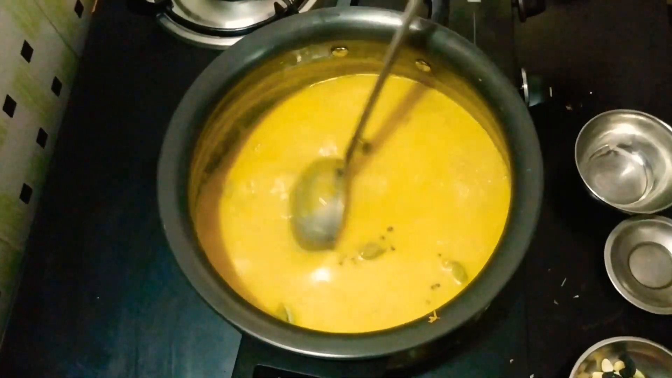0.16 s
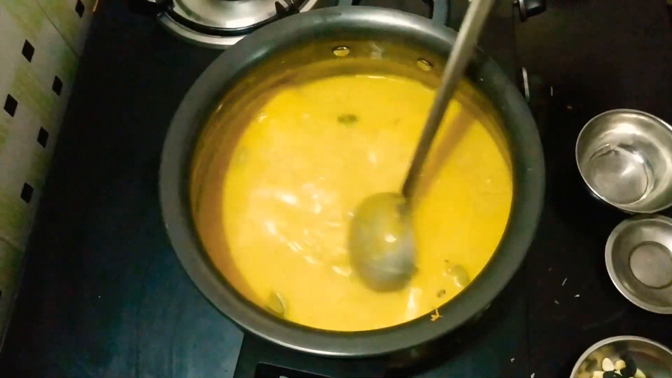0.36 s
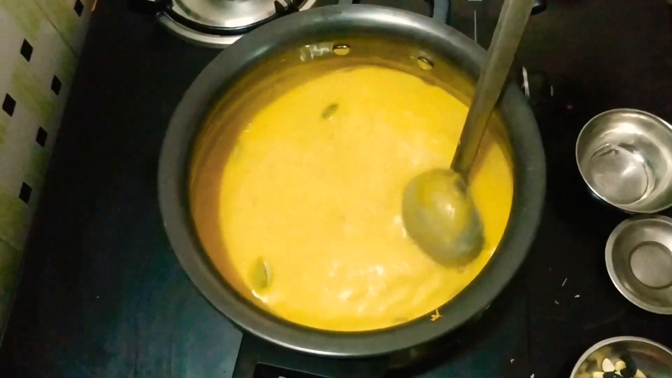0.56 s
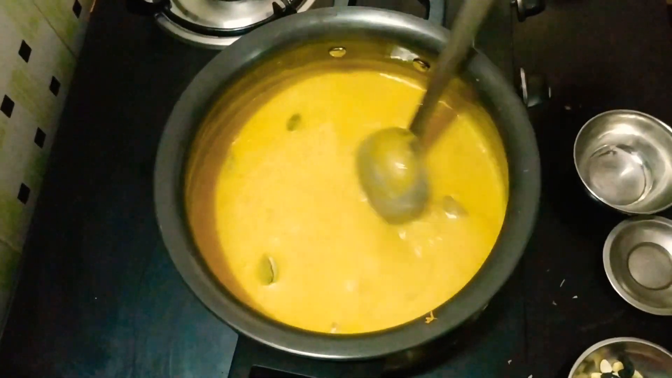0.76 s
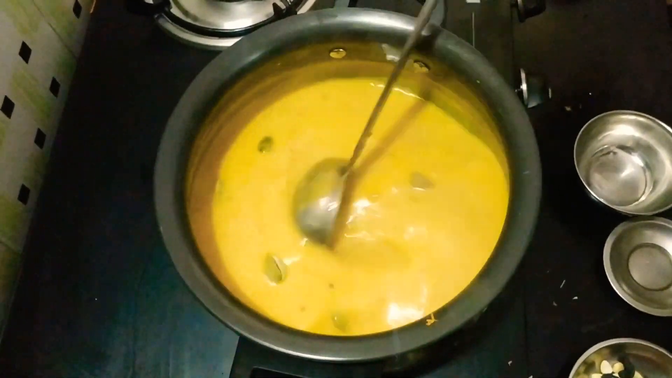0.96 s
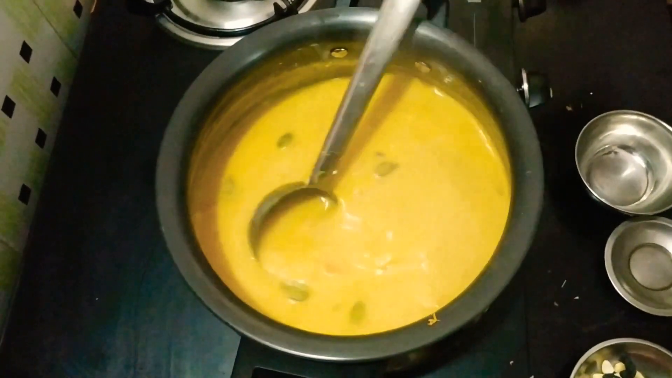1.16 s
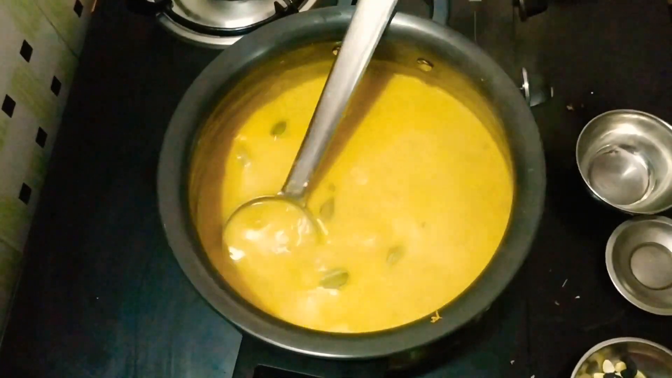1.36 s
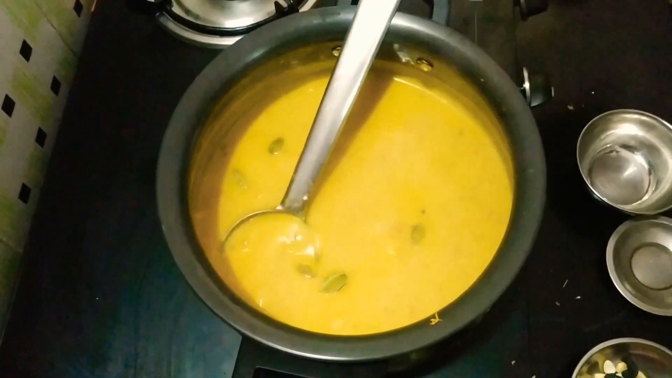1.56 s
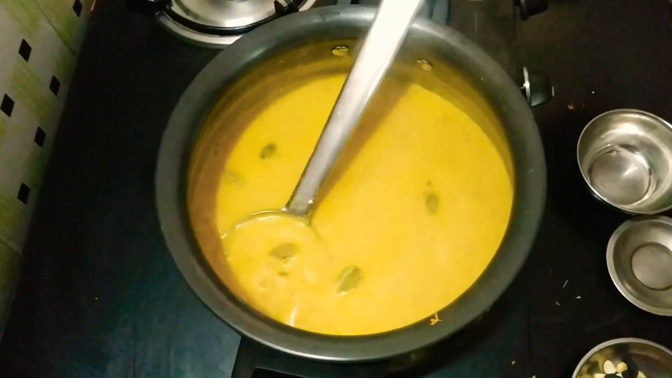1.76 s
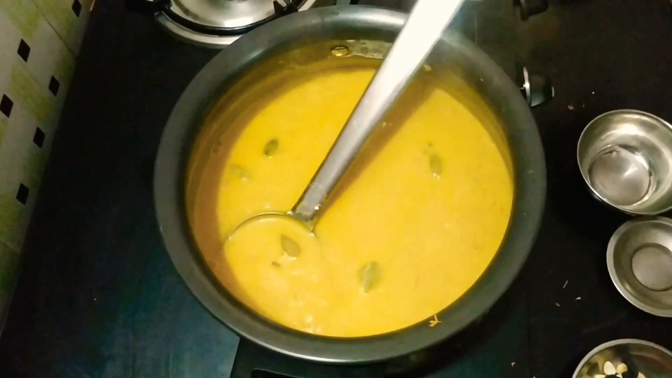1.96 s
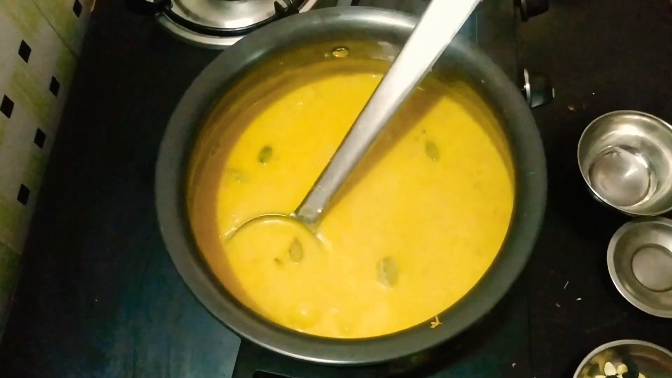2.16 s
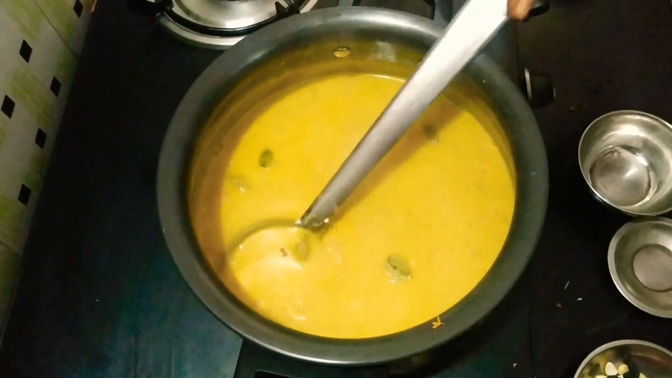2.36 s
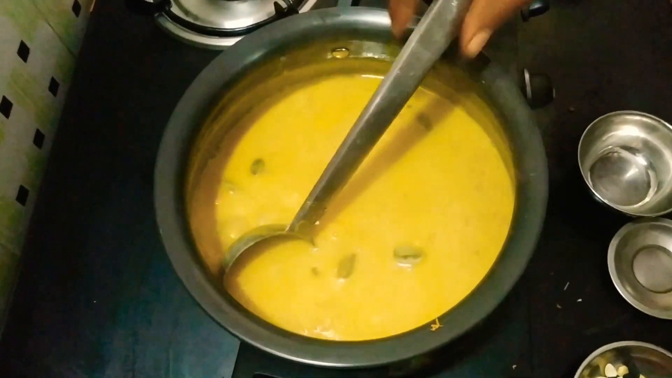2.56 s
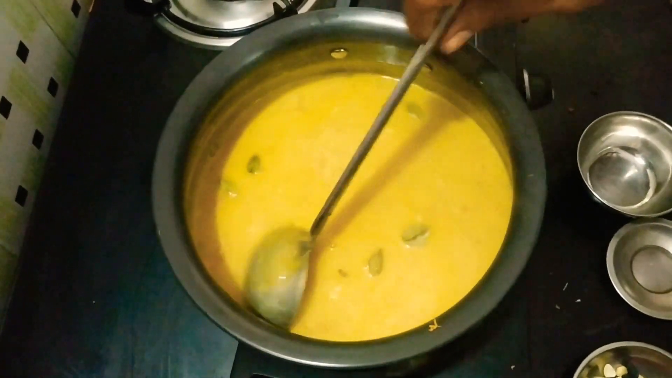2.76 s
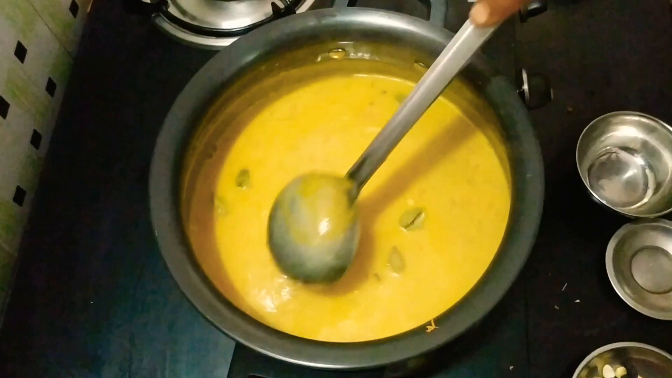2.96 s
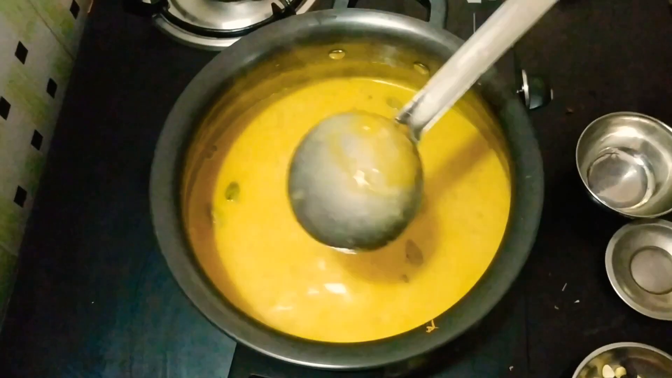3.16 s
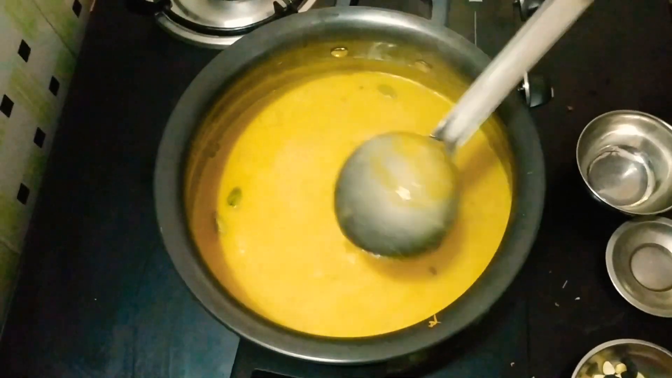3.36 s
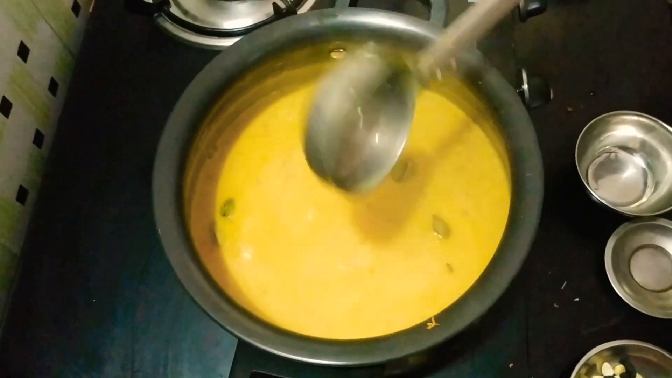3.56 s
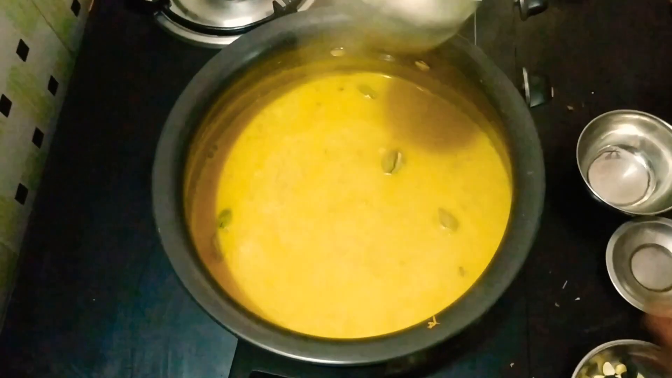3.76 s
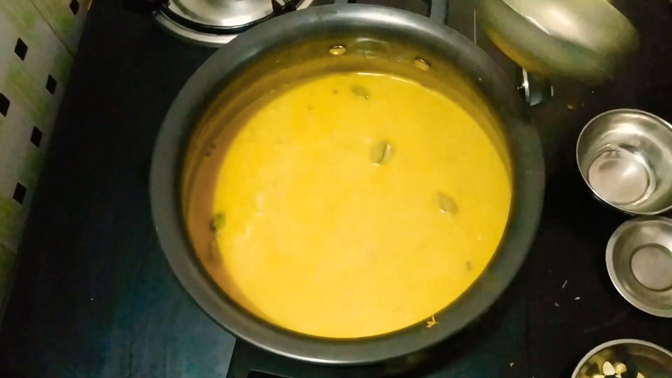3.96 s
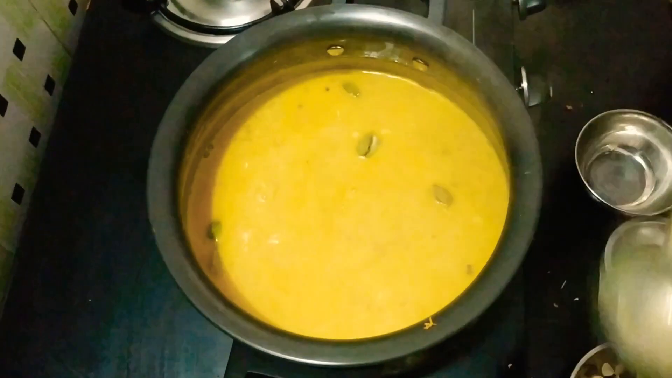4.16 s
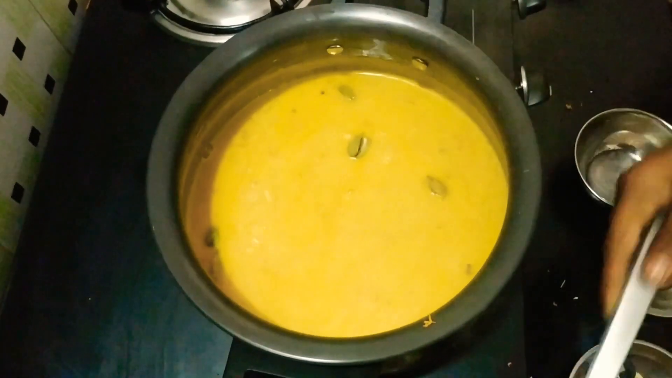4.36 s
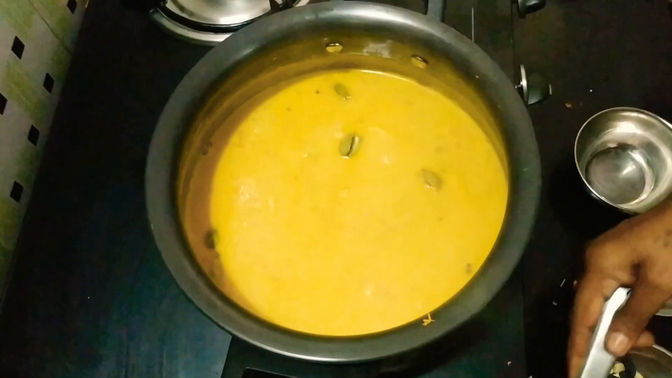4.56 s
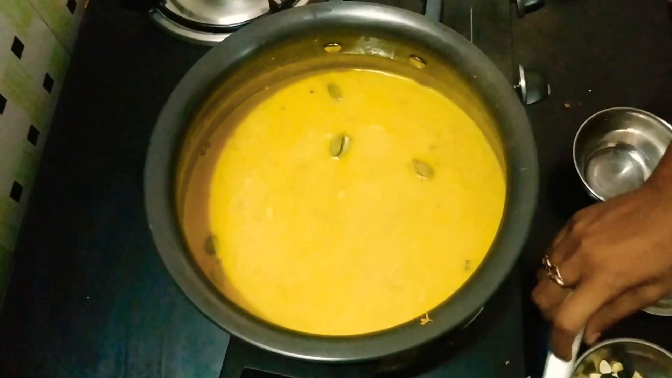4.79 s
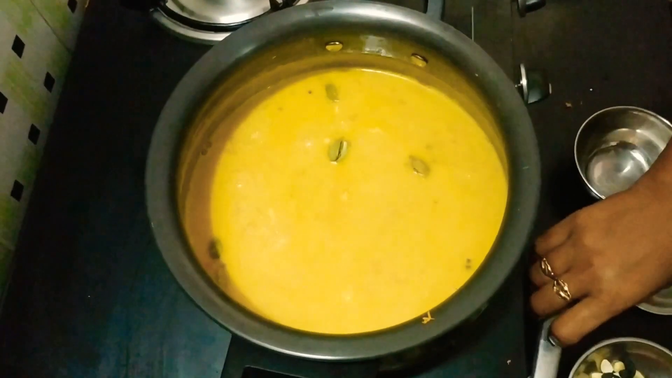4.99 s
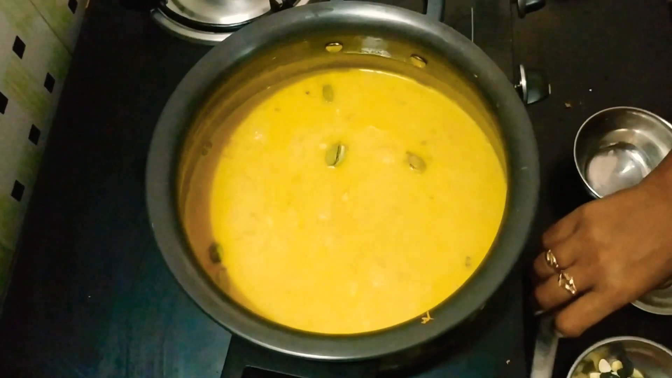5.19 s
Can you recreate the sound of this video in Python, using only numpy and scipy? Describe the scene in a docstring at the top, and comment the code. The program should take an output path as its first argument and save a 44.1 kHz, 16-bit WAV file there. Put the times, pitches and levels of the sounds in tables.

```python
"""A small, hard kitchen, a stereo pair of microphones close to a metal pot on the stove.
A steel ladle swishes through thick curry, knocks the full pot into a damped boom, and clinks and
scrapes along the ringing wall. It is lifted out, set down on the counter, and at last clatters
against a thin steel bowl. The tiles give a short tail; the room hums faintly behind it all."""
import sys
import numpy as np
from scipy import signal
from scipy.fft import rfft, irfft
from scipy.io import wavfile
from scipy.ndimage import uniform_filter1d, map_coordinates

SR = 44100
rng = np.random.default_rng(int(sys.argv[2]) if len(sys.argv) > 2 else 0)


def waveform_to_disk(signal):
    """Save audio, clipped to [-1, 1], as 16-bit WAV at the path in sys.argv[1]."""
    frames = np.transpose(np.atleast_2d(signal))
    scaled = np.clip(frames, -1, 1) * 32767
    samples = np.round(scaled).astype(np.int16)
    wavfile.write(sys.argv[1], SR, samples)


N = 230476
TIME = np.arange(N) / SR
RING_TIME = TIME[:SR]  # every strike gets one second to ring

# Spectrum of the ladle's clack on pot or counter. Each row: frequency in Hz, relative level in dB.
CLACK_SPECTRUM = [(150, 4), (350, 5), (700, -1), (1000, -2), (1400, 3.5), (1900, -7.5), (2700, 2),
                  (4000, -9), (8000, -11.5), (16000, -25)]


def amp(db):
    """Decibels to gain."""
    return 10 ** (np.asarray(db) / 20)


def unit(x):
    """Scales to rms 1."""
    return x / np.sqrt(np.mean(x ** 2) + 1e-20)


def read(points, hz):
    """Reads a table on a log-frequency axis."""
    f, value = np.transpose(points)
    return np.interp(np.log(hz + 1), np.log(f + 1), value)


def add(mix, start, sound):
    """Adds a stereo sound at start, in seconds."""
    part = mix[:, round(start * SR):][:, :sound.shape[1]]
    part += sound[:, :part.shape[1]]


def wander(per_s):
    """A random curve that takes per_s new turns a second."""
    knots = np.arange(0, N / SR + 1, 1 / per_s)
    return np.interp(TIME, knots, rng.standard_normal(len(knots)))


def lumps(per_s, depth_db):
    """A gain that wanders at random."""
    return amp(depth_db * wander(per_s))


def wavering(x, per_s, share):
    """Lets every pitch in x wander by a small share."""
    position = np.arange(N) + share * SR / per_s * wander(per_s)
    return np.array([map_coordinates(side, [position], order=3) for side in x])


def patchy(x, depth_db):
    """Brief patches, each at its own pitch, flare up and drop out."""
    spectra = signal.stft(x, nperseg=256)[2]
    field = rng.standard_normal(spectra.shape[:0:-1])  # time by frequency
    field = uniform_filter1d(uniform_filter1d(field, size=11, axis=0), size=3, axis=1)
    return signal.istft(spectra * amp(depth_db * unit(field).T), nperseg=256)[1][:, :N]


def stroke(peak, attack, hold, release, depth_db=21.5):
    """Gain of one hand movement: rises depth_db per attack time, holds, falls as much per release."""
    under = np.maximum(peak - TIME, 0) / attack + np.maximum(TIME - peak - hold, 0) / release
    return amp(-depth_db * np.minimum(under, 10))


def grains(per_s, spread_db):
    """Random clicks of uneven size."""
    size = amp(spread_db * np.minimum(rng.exponential(1, N), 4))
    return unit(size * rng.choice([-1, 1], N) * (rng.random(N) < per_s / SR))


def coloured(x, gain):
    """Filters two unrelated channels by gain(Hz); the bass reaches both microphones nearly alike."""
    # Likeness across the pair. Each row: frequency in Hz, left-right correlation.
    likeness = [(30, 0.98), (100, 0.96), (350, 0.87), (650, 0.72), (1200, 0.12), (2500, 0), (16000, 0)]
    hz = np.fft.rfftfreq(x.shape[1], 1 / SR)
    a, b = rfft(x)
    same = read(likeness, hz)
    mid, side = a * np.sqrt(1 + same), b * np.sqrt(1 - same)
    return unit(irfft(np.array([mid + side, mid - side]) * gain(hz), x.shape[1]))


def resonate(x, hz, width):
    """A steep resonance that can follow a moving frequency."""
    carrier = np.exp(2j * np.pi * np.cumsum(hz * np.ones(N)) / SR)
    pole = np.exp(-np.pi * width / SR)
    return unit((carrier * signal.lfilter([1], np.poly([pole, pole]), x / carrier)).real)


def crash(gain, t60):
    """A crowd of overlapping modes: coloured noise that dies away."""
    return coloured(rng.standard_normal((2, SR)), gain) * amp(-60 * RING_TIME / t60)


def ring(modes, length=1):
    """Decaying modes, some leaning to one side; short waves reach the pair in unrelated phase."""
    out = np.zeros((2, SR))
    for hz, db, t60, *lean in modes:
        phase = rng.uniform(-np.pi, np.pi, (2, 1)) * min((hz / 1500) ** 2, 1)
        sides = unit(amp(sum(lean) / 2 * np.array([[1], [-1]])))
        decay = amp(db - 60 * RING_TIME / (t60 * length))
        out += sides * decay * np.sin(2 * np.pi * hz * RING_TIME + phase)
    return out / np.linalg.norm(amp([mode[1] for mode in modes]))


def room_tone(air_db=-54.5):
    """The kitchen behind the pot: steady rumble and hiss with a few wavering low tones."""
    # Rumble and hiss. Each row: frequency in Hz, relative level in dB.
    air_spectrum = [(12, -4), (19, 2.5), (55, -11), (85, -5.5), (153, -11.5), (181, -24.5), (221, -16.5),
                    (284, -16), (419, -19), (693, -26), (775, -29.5), (2240, -32.5), (6120, -36.5),
                    (13400, -38), (15800, -36)]
    # The low drone. Each row: frequency in Hz, width in Hz, level in dB.
    hum_tones = [(82.7, 9.4, -62), (183.9, 8.7, -69.5), (291, 20, -69.5), (371.3, 14, -74.5)]
    air = coloured(rng.standard_normal((2, N)), lambda hz: amp(read(air_spectrum, hz)))
    hum = sum(amp(db) * resonate(rng.standard_normal(N), hz, width) for hz, width, db in hum_tones)
    return amp(air_db) * air + hum


def swishes(swish_db=-1, fizz_db=-2):
    """Each move swells as a grainy swish and fizz, like thick liquid folding and tiny bubbles bursting."""
    # The ladle moves in the curry, then in the hand on its way to the counter.
    # Each row: peak time, attack and release in seconds, relative swish and fizz levels in dB.
    moves = [(.02, 0.13, 0.24, -76, -55.5), (0.099, 0.12, 0.66, -50, -56.5), (.31, 0.1, 0.077, -56, -57.5),
             (0.539, 0.23, 0.09, -48.5, -53), (.785, 0.26, 0.38, -46, -50.5),
             (1.045, 0.023, 0.086, -58, -52.5), (1.105, 0.035, 0.13, -50.5, -56),
             (1.258, 0.04, 0.066, -53, -74), (1.411, 0.16, 0.21, -57.5, -61),
             (2.43, 0.66, 0.52, -60, -57.5), (2.706, 0.039, 0.086, -50.5, -58),
             (3.44, 0.11, 0.58, -79, -61), (3.74, 0.08, 0.099, -80, -60.5), (4.32, 1, 0.52, -64, -86),
             (4.72, 0.4, 0.72, -66, -60)]
    # Spectra of the swish and of the fizz on top. Each row: frequency in Hz, relative level in dB.
    swish_spectrum = [(300, -18), (700, 0.5), (1300, 2.5), (1700, -1.5), (2550, 4.5), (3400, -6.5),
                      (5000, -7), (8000, -17)]
    fizz_spectrum = [(2500, -8.5), (5000, -6.5), (8000, -3), (10000, -5.5), (12500, -9.5), (16000, -18)]
    swells = np.array([stroke(peak, attack, 0, release) for peak, attack, release, _, _ in moves])
    swish, fizz = np.transpose(moves)[-2:]
    out = np.zeros((2, N))
    for spectrum, db in ((swish_spectrum, swish + swish_db), (fizz_spectrum, fizz + fizz_db)):
        pops = np.array([grains(per_s=1500, spread_db=0.5) for _ in range(2)])
        wash = coloured(pops + rng.standard_normal((2, N)), lambda hz: amp(read(spectrum, hz)))
        texture = patchy(wash, depth_db=3.3) * lumps(per_s=90, depth_db=2.16)
        out += unit(texture) * np.sqrt(amp(db) ** 2 @ swells ** 2)  # moves add in power
    return out


def rubbing(strokes, mode_sets, rub_db=-4):
    """Fine slips keep a few resonances sounding for the length of each stroke."""
    out = np.zeros((2, N))
    for (peak, attack, hold, release, push_db), modes in zip(strokes, mode_sets):
        clicks = np.array([grains(per_s=2400, spread_db=5.0) for _ in range(2)])
        slips = coloured(clicks, np.ones_like)
        body = sum(amp(db) * resonate(np.roll(slips, rng.integers(N), axis=1), hz, width)
                   for hz, width, db in modes)
        out += amp(push_db + rub_db) * stroke(peak, attack, hold, release) * body
    return out


def floor_rubs():
    """The sunken ladle rubs across the pot floor, muffled by the curry."""
    # Each row: time of full pressure, attack, hold and release in seconds, relative level in dB.
    strokes = [(0.207, 0.28, 0.11, 0.22, -55.5), (2.877, 0.05, 0.025, 0.32, -48)]
    # The pot floor's ring, one list a stroke. Each row: frequency and width in Hz, relative level in dB.
    floor_modes = [
        [(828, 91, 0.5), (1026, 240, 3.5), (1227, 19, 0)],
        [(510, 110, -12), (896, 200, -6.5), (1000, 99, -5.5), (1240, 380, -3), (1420, 56, -2.5)],
    ]
    return rubbing(strokes, floor_modes)


def clack(cutoff_hz, t60):
    """The short noise of a hard contact, rolled off above the cut-off."""
    return crash(lambda hz: amp(read(CLACK_SPECTRUM, hz)) / np.sqrt(1 + (hz / cutoff_hz) ** 4), t60)


def thud(t60):
    """The dull shudder of the worktop."""
    onset = 1 - np.exp(-RING_TIME / 0.0069)
    return crash(lambda hz: 1 / (1 + ((hz - 300) / 160) ** 4), t60) * onset


def pot_knocks(thud_db=-9):
    """Each knock of the ladle booms the pot; harder contacts add a brighter clack."""
    # Each row: start in seconds, boom level in dB, boom rise in seconds, ring length factor,
    # clack level in dB, clack cut-off in Hz, clack t60 in seconds.
    knocks = [(0.453, -32.5, 0.0038, 0.83, -39.5, 590, 0.12), (0.471, -59, 0.0033, 0.77, -53, 2780, 0.15),
              (0.795, -30, 0.0013, 1.03, -30.5, 4100, 0.064), (0.815, -41, 0.0035, 0.6, -39, 2160, 0.33),
              (0.909, -34, 0.0024, 0.61, -33.5, 1970, 0.082), (1.084, -46, 0.003, 0.6, -47, 1560, 0.06),
              (1.174, -53.5, 0.0033, 2.2, -49.5, 3970, 0.14),
              (1.366, -31.5, 0.0015, 0.55, -48, 1000, 0.056), (1.382, -42.5, 0.0043, 3.2, -55, 2050, 0.41),
              (1.503, -30.5, 0.0018, 1.25, -33, 4040, 0.12), (1.524, -36, 0.0036, 0.71, -36, 2420, 0.098),
              (1.549, -33, 0.0018, 1.2, -42.5, 2020, 0.39),
              (2.725, -40.5, 0.0043, 1.65, -32.5, 4170, 0.036)]
    # The full pot, damped by curry. Each row: frequency in Hz, relative level in dB, base t60 in seconds.
    pot_modes = [(78.8, -3.5, 0.34), (183.4, 10, 0.17), (244.5, 4.5, 0.53), (291, 2.5, 0.32),
                 (370.6, -3.5, 0.19), (406, -14, 0.14), (446, -0.5, 0.16), (611, -7, 0.15),
                 (667, -6.5, 0.088)]
    out = np.zeros((2, N))
    for start, boom_db, rise, length, clack_db, cutoff_hz, t60 in knocks:
        contact = amp(clack_db) * clack(cutoff_hz, t60)
        boom = ring(pot_modes, length) + amp(thud_db) * thud(t60=0.25)
        onset = 1 - np.exp(-RING_TIME / rise)
        add(out, start, amp(boom_db) * boom * onset + contact)
    return out


def steel_ring(part, length, ring_db=-3, crowd_t60=0.11, valley_db=-27):
    """One touch on the pot wall; the part of the ladle that touches decides which modes speak."""
    # Tight clusters of modes in ladle and wall. Each row: frequency and width in Hz, left minus right
    # in dB, then relative level in dB when touched by the ladle's rim, back and heel.
    clusters = [(2110, 320, 0, -6.5, -16, -16), (2780, 360, -3.5, -12.5, -6.5, -7),
                (3830, 71, -1, -17, -17, -21), (4360, 170, 1, -8, -11, -9.5),
                (4920, 72, -8, -5, -10.5, -16), (5494, 170, -1, -6.5, -10.5, -20),
                (5960, 180, 9, -12, -17, -11), (6300, 170, 1, -5, -3, -15), (6440, 68, -9, -4, -10, -11),
                (6690, 64, -8, -12, -7, -2), (7300, 180, 2, -6, -7, -6), (7380, 120, 4, -6, -4.5, -12),
                (7760, 150, 2, -6, -14, -11), (7840, 210, -2, 4, -3, -9), (8290, 120, 7, 0.5, -3, -4),
                (8670, 160, -4, -7, -7, -7), (8980, 140, 8, -2.5, -11, -19), (9320, 88, 7, -5, -10, -5),
                (9820, 110, -6, -3, -4.5, -9.5), (10020, 94, -7, 1.5, -6.5, -5),
                (10880, 290, 2, -3, -10.5, -14), (11870, 180, -1, -6, -8, -14),
                (12180, 140, 3, -14, -16, -6), (13100, 300, 0, -11, -18, -12),
                (14170, 320, -1, -12, -12, -12), (15620, 200, 11, -18, -19, -27)]
    column = ("rim", "back", "heel").index(part)
    touched = [(hz, width, lean, levels[column]) for hz, width, lean, *levels in clusters]

    def gain(f):
        """Clusters with deep valleys between them."""
        peaks = sum(amp(2 * db + lean * np.array([[1], [-1]]))
                    / (1 + ((f - hz) / (width * 0.55)) ** 2) ** 2 for hz, width, lean, db in touched)
        valleys = amp(valley_db) ** 2 * f ** 2 / (f ** 2 + 900 ** 2)
        return np.sqrt(peaks + valleys)

    # The tighter a cluster, the longer its main mode rings.
    main_modes = [(hz, db, 14.2 / width, lean) for hz, width, lean, db in touched]
    return crash(gain, crowd_t60 * length) + amp(ring_db) * ring(main_modes, length)


def clinks(steel_db=-2, crack_db=-8, crack_t60=0.05):
    """Glancing touches of steel: a bright crack, and a ring that builds up while the edge skids."""
    # Each row: start in seconds, relative level in dB, contact time in seconds, ring length factor,
    # part of the ladle.
    touches = [(0.536, -38, 0.0028, 0.3, "rim"), (1.546, -25, 0.0019, 0.79, "rim"),
               (1.549, -24, 0.0025, 0.65, "rim"), (1.593, -26, .004, 0.48, "rim"),
               (1.598, -18.5, 0.0025, 0.66, "rim"), (1.606, -25, 0.0034, 0.64, "rim"),
               (2.252, -32, 0.0028, 0.63, "heel"), (2.275, -29, 0.0043, 0.93, "heel"),
               (2.289, -41, 0.002, 1.5, "heel"), (2.727, -32, 0.00076, 0.16, "rim"),
               (2.979, -52, 0.0017, 0.6, "heel"), (3.390, -48, 0.00088, 0.13, "heel"),
               (4.606, -39, 0.00047, 0.22, "heel")]
    out = np.zeros((2, N))
    for start, db, contact, length, part in touches:
        crack = crash(lambda hz: hz ** 2 / (hz ** 2 + 4500 ** 2), crack_t60 * length)
        clink = amp(steel_db) * steel_ring(part, length) + amp(crack_db) * crack
        onset = 1 - np.exp(-2 * RING_TIME / contact)
        add(out, start, amp(db) * clink * onset)
    return out


def low_wobbles():
    """After a hard knock the pot wobbles low; a faint 80 Hz swell lies under the final clatter."""
    # Each row: start in seconds, peak level in dB, frequency in Hz, swell time in seconds.
    wobbles = [(0.802, -45, 87, 0.026), (0.886, -42, 97.5, 0.065), (1.371, -46.5, 87.7, 0.028),
               (1.538, -52, 82.45, 0.095), (5.171, -64, 80, 0.017)]
    out = np.zeros((2, N))
    for start, db, hz, swell in wobbles:
        age = RING_TIME[None] / swell
        add(out, start, amp(db) * age * np.exp(1 - age) * np.sin(2 * np.pi * hz * RING_TIME))
    return out


def wall_scrape(chatter_db=1.5, friction_db=-1.5):
    """Tiny slips ring the steel; the chatter wavers and sinks in pitch as the contact point moves."""
    # Pushes along the wall. Each row: time of full pressure, hold and release in seconds, relative
    # friction and chatter levels in dB, ring length factor, part of the ladle.
    pushes = [(1.673, 0.035, 0.1, -48, -50, 0.98, "back"),
              (1.733, 0.0077, 0.065, -37.5, -43.5, 0.99, "back"),
              (1.799, 0.015, 0.19, -33, -42, 0.74, "back"), (1.876, 0.013, 0.1, -33.5, -62, 0.46, "back"),
              (1.93, 0.0065, 0.089, -37.5, -49.5, 0.58, "back"),
              (1.987, 0.027, 0.089, -43.5, -50.5, 0.91, "back"),
              (2.254, 0.0087, 0.046, -38.5, -69, 0.6, "heel"),
              (2.278, 0.016, 0.062, -36, -60, 0.62, "heel")]
    # The dragged edge. Each row: base frequency and width in Hz, relative level in dB, share of the glide.
    chatter_modes = [(912, 70, -3, 0.88), (2120, 72, 11, 1), (2680, 80, 4, 0.3), (2811, 51, 6.5, 0.22),
                     (3805, 23, -1.5, 0.88), (6240, 41, 6, 0.5)]
    # The glide of the strongest resonance. Each row: time in seconds, frequency in Hz.
    chatter_pitch = [(1.66, 2172), (1.75, 2129), (1.83, 2108), (1.9, 2081), (2.05, 2027)]
    bite_s, build_s = 0.027, 0.048  # the edge bites at once; the chatter needs time to build up
    friction, pressure = np.zeros((2, N)), np.zeros(N)
    for peak, hold, release, slip_db, shake_db, length, part in pushes:
        slips = grains(per_s=800, spread_db=2) * lumps(per_s=110, depth_db=2.5)
        slips *= stroke(peak, bite_s, hold, release)
        body = steel_ring(part, length)
        body /= np.sqrt(np.sum(body ** 2) / 2)
        friction += amp(slip_db) * signal.oaconvolve(slips[None], body, axes=1)[:, :N]
        pressure += amp(shake_db) * stroke(peak, build_s, hold, release)
    glide = np.interp(TIME, *np.transpose(chatter_pitch)) / chatter_modes[1][0]
    glide *= 1 + 0.006 * wander(per_s=45)
    chatter = sum(amp(db) * resonate(rng.standard_normal((2, N)), hz * glide ** share, width)
                  for hz, width, db, share in chatter_modes)
    friction = wavering(friction, per_s=30, share=0.0013)
    return amp(friction_db) * friction + amp(chatter_db) * unit(chatter) * pressure


def ladle_brushes():
    """The lifted ladle is brushed lightly and, hanging free, shimmers."""
    # Each row: time of full pressure, attack, hold and release in seconds, relative level in dB.
    strokes = [(2.99, 0.026, 0.013, 0.089, -57.5), (3.74, 0.058, 0.05, 0.27, -60.5)]
    # The shimmer, one list a stroke. Each row: frequency and width in Hz, relative level in dB.
    ladle_modes = [
        [(7850, 210, -0.5), (13050, 200, -1)],
        [(3850, 300, -7.5), (6770, 220, -8), (7400, 110, -4), (11400, 340, -3), (13400, 220, -2)],
    ]
    return rubbing(strokes, ladle_modes)


def set_down(clack_db=-7):
    """The held ladle lands on the counter with a short, dull ring."""
    # Each row: start in seconds, level of the ring with its clack in dB, thud level in dB.
    landings = [(4.602, -41.5, -44), (4.607, -39, -48), (4.6104, -33.5, -46)]
    # Ladle on counter. Each row: frequency in Hz, relative level in dB, t60 in seconds.
    counter_modes = [(217, 10, 0.17), (376, 12, 0.14), (2310, -5, 0.07), (2510, 7.5, 0.13), (3480, 3, 0.03),
                     (3650, 7, 0.028), (3620, -13, 0.3)]
    out = np.zeros((2, N))
    for start, db, thud_db in landings:
        contact = amp(clack_db) * clack(cutoff_hz=4500, t60=0.13) + ring(counter_modes)
        add(out, start, amp(db) * contact + amp(thud_db) * thud(t60=0.084))
    return out


def bowl_clatter(crash_db=-7.5, favour_db=17.5, favour_octaves=0.074, rise_s=0.00063):
    """The ladle bounces on a thin steel bowl, jolting the worktop; each spot struck favours one pitch."""
    # Each row: start in seconds, level in dB, treble tilt in dB per octave, crash t60 in seconds,
    # favoured frequency in Hz, worktop knock in dB.
    strikes = [(5.17, -36, 1, 0.051, 8830, -64), (5.174, -20, 0.5, 0.091, 4720, -40.5),
               (5.191, -8.5, 10, 0.067, 7250, -53), (5.1923, -14, 1, .05, 2780, -39.5),
               (5.1947, -12.5, 0.5, 0.13, 4468, -60), (5.197, -18.5, 8, 0.16, 9780, -60),
               (5.209, -14.5, 2, 0.015, 1880, -51), (5.2116, -10.5, -1.5, 0.03, 3260, -30.5),
               (5.222, -19, 0.5, .1, 4720, -53)]
    # The bowl's ring. Each row: frequency in Hz, relative level in dB, t60 in seconds,
    # left minus right in dB.
    bowl_modes = [(1894, -1, 0.018, 2), (2780, 0, 0.085, 4), (3260, 4, 0.035, -1), (4468, -7, 0.05, 7),
                  (4720, -9, 0.04, 2), (6984, -2, 0.067, 6), (7146, -3, 0.04, 4), (7358, -2, 0.04, 6),
                  (8400, -2, .07, -11), (8850, 0, 0.08, 5), (9774, 1, 0.09, -5), (10011, -1, 0.08, -3),
                  (11885, 6, 0.03, -1), (14700, -10, .05, 2), (15665, -14, .08, 2)]
    # The bowl's crash. Each row: frequency in Hz, relative level in dB.
    crash_spectrum = [(290, -28), (1000, -19), (1800, -7.5), (2600, -4), (2750, -17), (3620, -6),
                      (3780, -9), (4300, -2.5), (5420, -5.5), (7240, -4.5), (12000, -12.5), (15800, -20.5)]
    # The worktop's knock. Each row: frequency in Hz, relative level in dB, t60 in seconds.
    worktop_modes = [(234, 3.5, 0.11), (361, 6, 0.082), (407, 2, 0.045)]
    out = np.zeros((2, N))
    for start, db, tilt_db, t60, spot_hz, knock_db in strikes:
        modes = []
        for hz, mode_db, decay, lean in bowl_modes:
            nearness = np.exp(-(np.log2(hz / spot_hz) / favour_octaves) ** 2)
            modes.append((hz, mode_db + tilt_db * np.log2(hz) + favour_db * nearness, decay, lean))
        burst = crash(lambda hz: amp(read(crash_spectrum, hz) + tilt_db * np.log2(hz + 1)), t60)
        hit = amp(db) * (ring(modes) + amp(crash_db) * burst) + amp(knock_db) * ring(worktop_modes)
        add(out, start, hit * (1 - np.exp(-RING_TIME / rise_s)))
    return out


def tiled_room(x, wet_db=-9, build_s=0.02):
    """Tiles throw back a short, bright tail behind the close sound."""
    # The kitchen's decay. Each row: frequency in Hz, t60 in seconds.
    decay_times = [(100, 0.57), (500, 0.68), (2500, 0.43), (8000, 0.41), (15000, 0.27)]
    noise = coloured(rng.standard_normal((2, SR)), np.ones_like)
    hz, t, spectra = signal.stft(noise, SR, nperseg=256)
    decay = amp(-60 * t / read(decay_times, hz)[:, None])
    tail = signal.istft(spectra * decay, SR, nperseg=256)[1][:, :SR]
    tail *= np.minimum(RING_TIME / build_s, 1)
    return x + amp(wet_db) * signal.fftconvolve(x, tail / np.linalg.norm(tail[0]), axes=1)[:, :N]


def scene():
    """The ladle's contacts ring into the room; wobbles, swishes and room tone stay dry."""
    contacts = pot_knocks() + clinks() + wall_scrape() + floor_rubs() + ladle_brushes()
    contacts += set_down() + bowl_clatter()
    return tiled_room(contacts) + low_wobbles() + swishes() + room_tone()


def record(dry, cutoff_hz=15900):
    """The two microphones differ a little in colour, and the highest treble is cut off."""
    # Balance of the pair. Each row: frequency in Hz, left minus right in dB.
    balance = [(100, -1.5), (700, -1), (1400, -0.5), (2400, 3), (4200, 2.5), (6500, 1), (15000, -0.5)]
    lean_db = read(balance, np.fft.rfftfreq(N, 1 / SR))
    heard = irfft(rfft(dry) * amp(np.array([lean_db, -lean_db]) / 2), N)
    lowpass = signal.firwin(511, cutoff_hz, window=("kaiser", 9), fs=SR)
    return signal.oaconvolve(heard, lowpass[None], "same")


dry = scene()
out = record(dry)
waveform_to_disk(out)
```